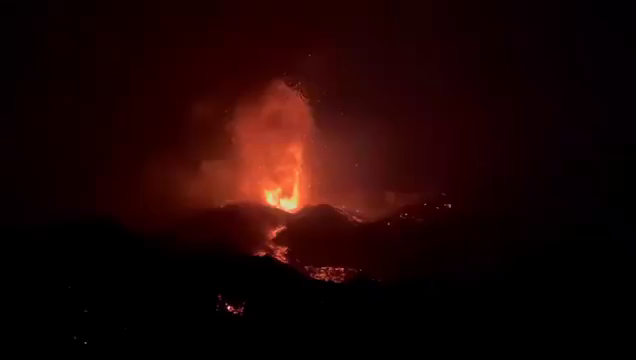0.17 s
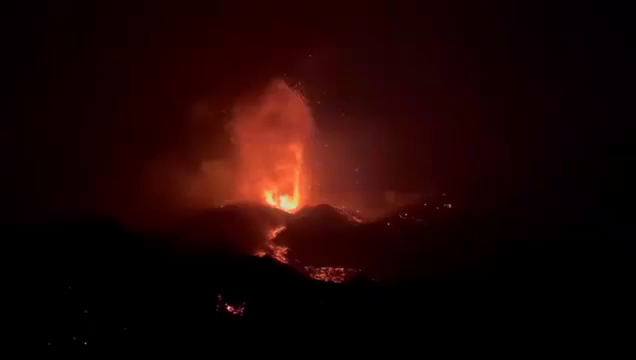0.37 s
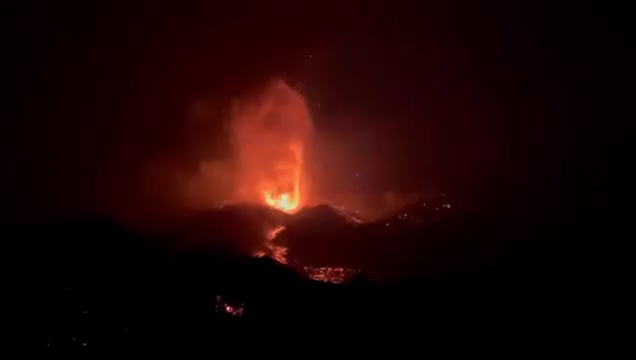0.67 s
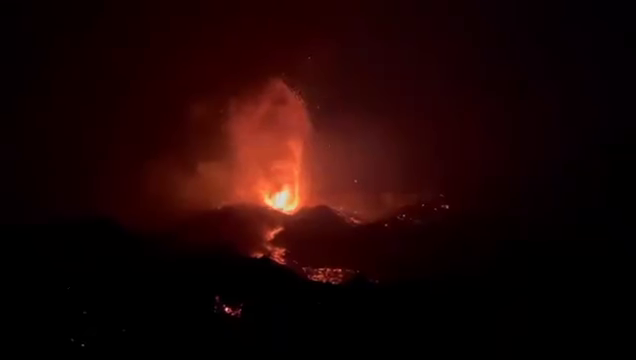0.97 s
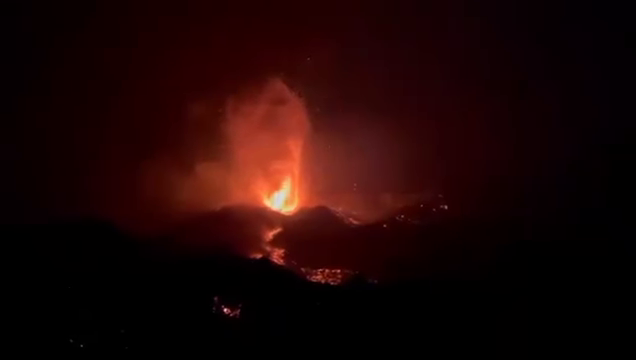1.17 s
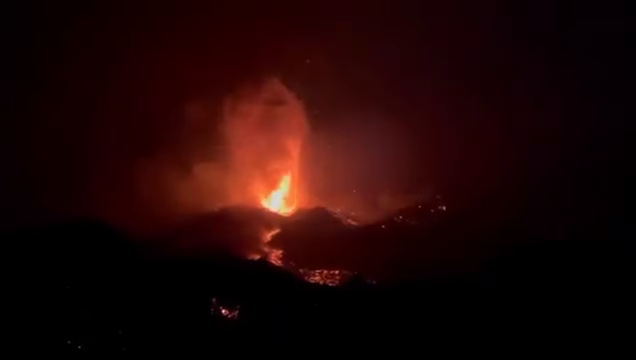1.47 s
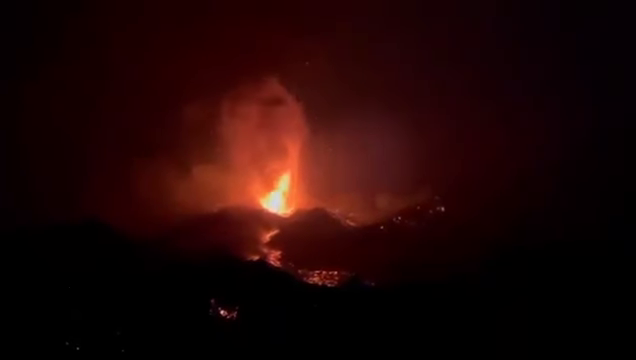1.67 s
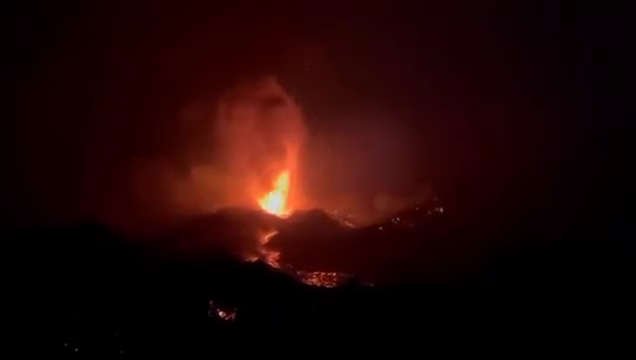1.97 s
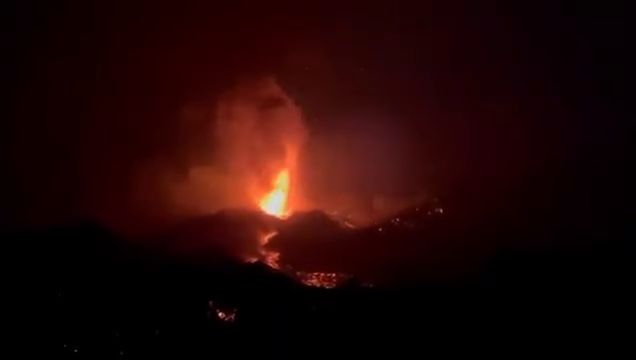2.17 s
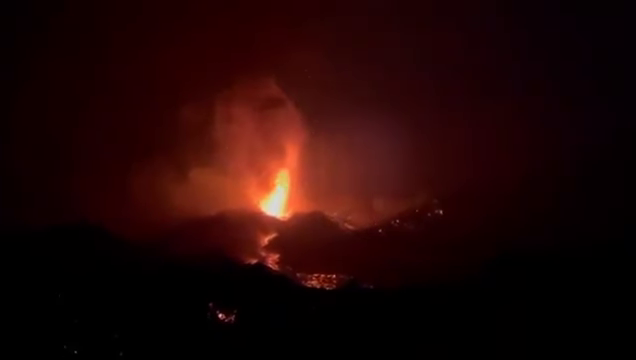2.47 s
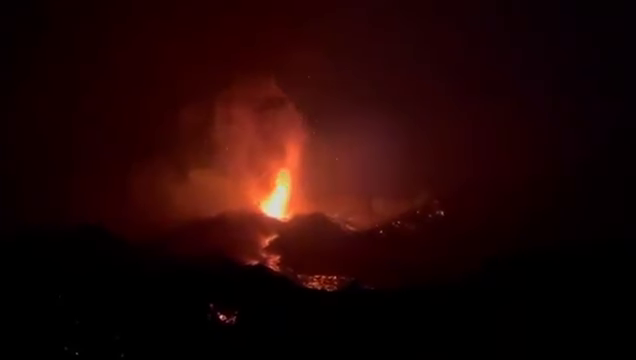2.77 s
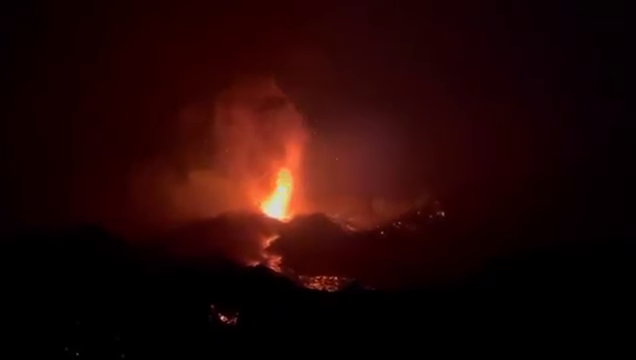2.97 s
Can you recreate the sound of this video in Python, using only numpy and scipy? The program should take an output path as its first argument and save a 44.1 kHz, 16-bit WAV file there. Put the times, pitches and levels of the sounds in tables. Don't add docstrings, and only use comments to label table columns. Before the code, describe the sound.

After 0.2 seconds of silence, a distant volcano's dull, turbulent roar starts abruptly over deep rumble. Faint metallic ticks sound close to the microphone at 0.4, 0.6 and 1.1, clustering around 2.2. The roar swells and brightens to about 1.3, with airy puffs, then turns boomier; the heaviest soft boom lands at 2.3. Faint grass hiss; tiny cricket chirps at 1.8 and 2.85. Cut off abruptly around 3.1.

```python
import sys
import numpy as np
from scipy import signal
from scipy.fft import rfft, irfft
from scipy.io import wavfile
from scipy.ndimage import uniform_filter1d

SR = 44100
rng = np.random.default_rng(int(sys.argv[2]) if len(sys.argv) > 2 else 0)


def volts_from_db(level):
    exponent = np.asarray(level, float) / 20
    return 10 ** exponent


def dump_mix(stems):
    frames = np.atleast_2d(stems).T
    limited = np.clip(frames, -1, 1)
    pcm = np.round(limited * 32767).astype(np.int16)
    wavfile.write(sys.argv[1], SR, pcm)


N = 137151

# pitch_hz [Hz], density_db [dB per Hz]
HISS_SPECTRUM = [(2600, -6), (4200, 0), (5500, -2), (7300, -5), (7750, -27), (9200, -20), (10700, -8),
                 (12300, -17)]
# start_s [s], level_db [dB]
GRASS_SWELL = [(.2, -83), (.42, -83), (.62, -80), (.76, -85), (.95, -85), (1.2, -87), (1.36, -85),
               (1.52, -89), (1.9, -90), (1.99, -86), (2.12, -90), (2.17, -84.5), (2.35, -85), (2.42, -89.5),
               (2.6, -87.5), (2.75, -86.5), (2.8, -88.5), (3.11, -88)]
# start_s [s], peak_db [dB]
CRICKET_CHIRPS = [
    (1.773, -71.5),
    (2.851, -81),
]
# start_s [s], peak_db [dB], brightness_db [dB]
METAL_TICKS = [(.372, -58, -10), (.633, -53.5, 0), (.883, -65, -3), (1.138, -58, -3), (1.195, -70, -2),
               (1.98, -66, -4), (2.16, -64, -2), (2.172, -68, -2), (2.195, -69, -1), (2.285, -67, -2),
               (2.305, -67, -1), (2.33, -67, -2), (2.35, -69, -2), (2.728, -68, -4), (2.755, -67, -5)]
# pitch_hz [Hz], level_db [dB], t60_s [s]
METAL_MODES = [(3800, -1, .012), (4075, 1, .025), (4500, -2, .012), (5000, -3, .014), (5600, 0, .022),
               (6300, -3, .012), (7100, 0, .018), (9650, -12, .015)]
# start_s [s], jet_level_db [dB], conduit_level_db [dB]
EFFORT = [(0.202, -35, -39), (0.419, -37, -50.5), (0.582, -35.5, -42.5), (0.72, -32, -41),
          (.95, -30, -46.5), (1.151, -28.5, -43.5), (1.27, -26, -37.5), (1.4, -30, -40),
          (1.599, -32.5, -36.5), (1.801, -36, -33), (2.1, -35.5, -35), (2.298, -34.5, -36.5),
          (2.421, -35, -34), (2.599, -34, -39.5), (2.75, -35, -32), (2.932, -33.5, -32.5),
          (3.11, -34.5, -36.5)]
# pitch_hz [Hz], density_db [dB per Hz]
RUMBLE_SPECTRUM = [(15, -31.5), (36, -10), (52, 4), (78, 0.5), (120, -3.5), (180, -5), (300, -12.5),
                   (600, -60)]
# start_s [s], peak_db [dB], pitch_hz [Hz]
BOOMS = [(.254, -34, 119), (.316, -30.5, 81.5), (.478, -40, 75), (.703, -34.5, 104.4), (.769, -22, 107.5),
         (.8, -29, 60.4), (.874, -26, 115), (.908, -29.5, 79.4), (.96, -31, 131), (1.09, -35, 70),
         (1.202, -33, 140), (1.228, -25.5, 94.6), (1.282, -26, 103), (1.305, -27, 130.6), (1.376, -29, 140),
         (1.41, -26.5, 130), (1.477, -30.5, 150), (1.547, -20, 135), (1.635, -26.5, 79),
         (1.669, -27.5, 140), (1.734, -19.5, 76.4), (1.762, -32, 68.4), (1.786, -22.5, 111.4),
         (1.8, -27, 58), (1.901, -27.5, 130), (1.914, -19.5, 84.3), (1.959, -26, 97), (2.017, -23.5, 133),
         (2.045, -22.5, 101), (2.168, -24, 99), (2.183, -29, 61), (2.222, -22.5, 80), (2.252, -23, 75),
         (2.279, -19.5, 133), (2.311, -33.5, 70.2), (2.336, -12, 93), (2.36, -27, 110), (2.441, -25.5, 86),
         (2.467, -27.5, 83), (2.515, -24, 68), (2.614, -27, 60), (2.652, -32, 120), (2.704, -27, 95),
         (2.751, -21, 120), (2.779, -27, 60), (2.805, -26.5, 94), (2.838, -32, 55.7), (2.851, -20, 111),
         (2.868, -23, 54.7), (2.902, -24, 63.5), (2.985, -32, 60), (3.026, -21.5, 112), (3.045, -24, 52.2),
         (3.08, -26.5, 123), (3.103, -26, 110)]
# start_s [s], peak_db [dB], pitch_hz [Hz]
PUFFS = [(.69, -33, 286), (.711, -28.5, 254), (.744, -30, 260), (.765, -26.5, 216), (.796, -32, 240),
         (.883, -29.5, 247), (.949, -32, 279), (1.018, -37, 252), (1.087, -23.5, 338), (1.15, -30, 754),
         (1.19, -26, 795), (1.211, -24, 292), (1.235, -26.5, 255), (1.255, -26.5, 690), (1.277, -23, 240),
         (1.306, -21, 310), (1.33, -20, 266), (1.348, -24, 253), (1.428, -24, 287), (1.478, -25, 231),
         (1.535, -30.5, 264), (1.59, -31, 243), (1.652, -32, 247), (1.69, -27, 423), (1.712, -27, 190),
         (1.73, -26, 305), (1.78, -26.5, 228), (1.895, -24, 237), (1.944, -28.5, 247), (1.971, -26, 285),
         (2.034, -26, 328), (2.048, -26, 222), (2.06, -30, 287), (2.068, -29.5, 560), (2.106, -26.5, 304),
         (2.141, -28.5, 271), (2.43, -24.5, 300), (2.509, -25, 335), (2.357, -25, 306), (2.64, -28, 240),
         (2.68, -28.5, 450), (2.702, -28.5, 255), (2.748, -37, 260), (2.878, -28, 227), (2.903, -27.5, 233),
         (2.978, -25, 254)]
# pitch_hz [Hz], density_db [dB per Hz]
JET_SPECTRUM = [(60, -21), (150, -12.5), (270, -1.5), (700, -10.5), (1450, -21), (2200, -29.5),
                (3400, -48.5), (4300, -73.5)]
# pitch_hz [Hz], width_hz [Hz], level_db [dB]
ECHO_DIPS = [(190, 32, 1.5), (226, 8.3, 1), (489, 63, -2), (1188, 110, -4), (1691, 115, -10),
             (1963, 91, -4.5), (2340, 150, -3.5)]


def evened(x):
    return x / np.sqrt(np.mean(x ** 2) + 1e-20)


def read(spectrum, hz):
    points_hz, level_db = np.transpose(spectrum)
    return np.interp(np.log(hz + 1), np.log(points_hz + 1), level_db)


def level(table, column):
    rows = np.array(table)
    return volts_from_db(np.interp(np.arange(N) / SR, rows[:, 0], rows[:, column]))


def add(mix, start_s, sound):
    part = mix[round(start_s * SR):][:len(sound)]
    part += sound[:len(part)]


def turbulence(field_db, size, patchy_db, patch_hz, patch_s, flicker_db):
    hop = size // 4
    hz = np.fft.rfftfreq(size, 1 / SR)[:, None]
    t = np.arange(N // hop + 5) * hop / SR
    real, imag, patches = rng.standard_normal((len(t), len(hz), 3)).T
    patch_bins = max(round(patch_hz * size / SR), 1)
    patch_frames = max(round(patch_s * SR / hop), 1)
    patches = uniform_filter1d(patches, patch_bins, 0)
    patches = evened(uniform_filter1d(patches, patch_frames, 1))
    flicker = evened(uniform_filter1d(rng.standard_normal(len(t)), 3))
    gain = volts_from_db(field_db(hz, t) + patchy_db * patches + flicker_db * flicker)
    noise = signal.istft((real + 1j * imag) * gain, nperseg=size, noverlap=size - hop)[1]
    return evened(noise[:N])


def grass():
    calm_db = np.mean(GRASS_SWELL, 0)[1]
    top_share = .35

    def field(hz, t):
        swell_db = np.interp(t, *np.transpose(GRASS_SWELL)) - calm_db
        steady_top = swell_db * (1 - top_share) * (hz > 8000)
        return read(HISS_SPECTRUM, hz) - 200 * (hz < 2600) - steady_top

    hiss = turbulence(field, size=512, patchy_db=2.4, patch_hz=500, patch_s=.05, flicker_db=1.2)
    return volts_from_db(3.2) * level(GRASS_SWELL, column=1) * hiss


def cricket():
    tone_hz, stroke_gap_s, stroke_s, fade_db = 4700, .0058, .0022, -.5
    out, t = np.zeros(N), np.arange(0, .04, 1 / SR)
    strokes = np.zeros(len(t))
    for k in range(4):
        center_s = stroke_s + k * stroke_gap_s
        strokes += volts_from_db(fade_db * k) * np.exp(-((t - center_s) / stroke_s) ** 2)
    chirp = strokes * np.sin(2 * np.pi * tone_hz * t)
    for start_s, peak_db in CRICKET_CHIRPS:
        add(out, start_s, volts_from_db(peak_db) * chirp)
    return out


def ticks():
    out, t = np.zeros(N), np.arange(0, .06, 1 / SR)
    onset = np.minimum(t / .0005, 1)
    for start_s, peak_db, bright_db in METAL_TICKS:
        ring = np.zeros(len(t))
        for hz, mode_db, t60_s in METAL_MODES:
            tilt_db = bright_db * np.log2(hz / 4000) * 2
            ring += volts_from_db(mode_db + tilt_db - 60 * t / t60_s) * np.sin(2 * np.pi * hz * t)
        add(out, start_s, volts_from_db(peak_db - 7) * onset * ring)
    return out


def rumble():
    def field(hz, t):
        return read(RUMBLE_SPECTRUM, hz) - 100 * (hz > 600) + 0 * t

    churning = turbulence(field, size=2048, patchy_db=1.2, patch_hz=80, patch_s=.04, flicker_db=.6)
    return level(EFFORT, column=2) * churning


def slug_bursts(table, cycles):
    sag, tail, lead_s = .28, 1.7, .04
    out = np.zeros(N)
    for start_s, peak_db, hz in table:
        u = np.arange(-lead_s, .08, 1 / SR) * hz
        envelope = np.exp(-(u / (cycles * np.where(u > 0, tail, 1))) ** 2)
        pitch_hz = hz * np.exp(-sag / cycles * np.tanh(u / cycles))
        turns = np.cumsum(pitch_hz) / SR
        turns -= turns[np.argmin(abs(u))]
        add(out, start_s - lead_s, volts_from_db(peak_db) * envelope * np.cos(2 * np.pi * turns))
    return out


def jet():
    brighten = .17
    air_hz, air_db_per_octave = 4000, -68
    rows = np.array(EFFORT)

    def field(hz, t):
        push_db = np.interp(t, rows[:, 0], rows[:, 1] - rows[:, 1].mean())
        tilt_db = brighten * push_db * np.log2((hz + 50) / 500)
        air_db = air_db_per_octave * np.log2(np.maximum(hz / air_hz, 1))
        return read(JET_SPECTRUM, hz) + tilt_db + air_db

    roar = turbulence(field, size=1024, patchy_db=1, patch_hz=300, patch_s=.04, flicker_db=.7)
    return level(EFFORT, column=1) * roar


def hillside(x):
    hz = np.fft.rfftfreq(N, 1 / SR)
    colour_db = sum(db * np.exp(-((hz - f) / width) ** 2) for f, width, db in ECHO_DIPS)
    return irfft(rfft(x) * volts_from_db(colour_db), N)


def scene():
    near = grass() + cricket() + ticks()
    bursts = slug_bursts(BOOMS, cycles=.7) + slug_bursts(PUFFS, cycles=1.4)
    volcano = rumble() + bursts + jet()
    return (near + hillside(volcano))[None]


def band_limit(x):
    return signal.sosfilt(signal.butter(12, 12230, fs=SR, output="sos"), x)


def record(dry):
    low_hz = 41
    start_s, start_step, start_decay_s = .207, -.014, .0021
    end_step, end_decay_s, end_fade_s = -.053, .003, .0002
    hz = np.fft.rfftfreq(N, 1 / SR)
    dry = irfft(rfft(dry) / np.sqrt(1 + (low_hz / (hz + 1)) ** 6), N)
    first = round(start_s * SR)
    since_start_s = np.maximum(np.arange(N) - first, 0) / SR
    to_end_s = np.arange(N)[::-1] / SR
    x = dry + (start_step - dry[:, first:first + 1]) * np.exp(-since_start_s / start_decay_s)
    x = x * (np.arange(N) >= first)
    x = x + (end_step - x[:, -1:]) * np.exp(-to_end_s / end_decay_s)
    x = x * np.sin(np.pi / 2 * np.minimum(to_end_s / end_fade_s, 1)) ** 2
    return band_limit(x)


dry = scene()
out = record(dry)
dump_mix(out)
```